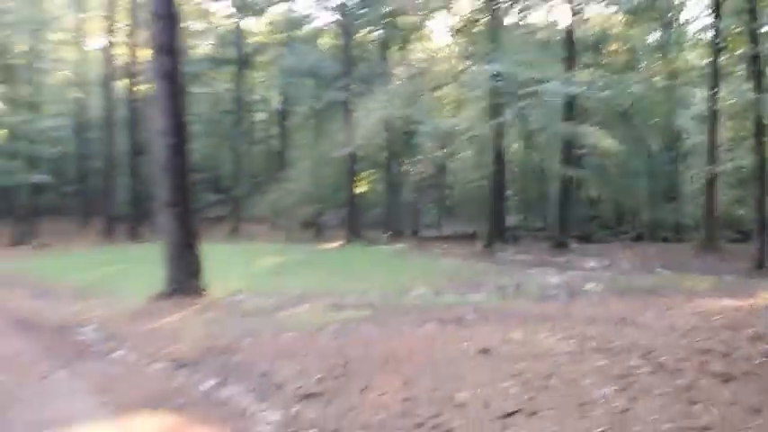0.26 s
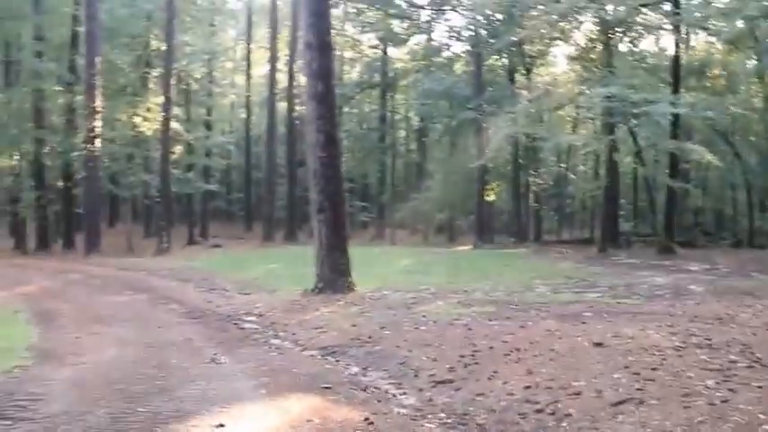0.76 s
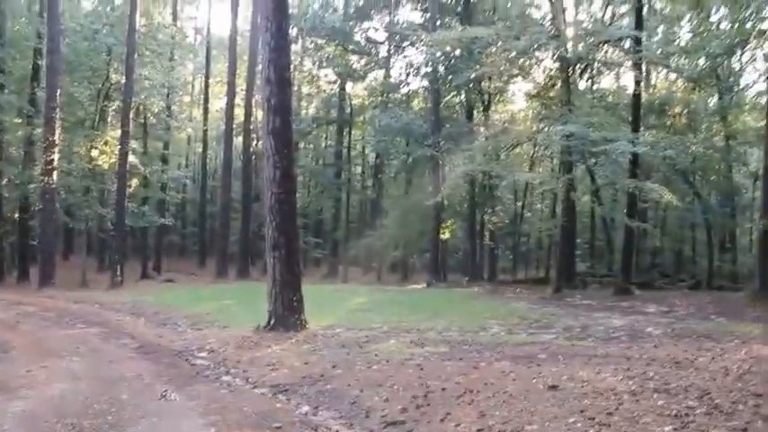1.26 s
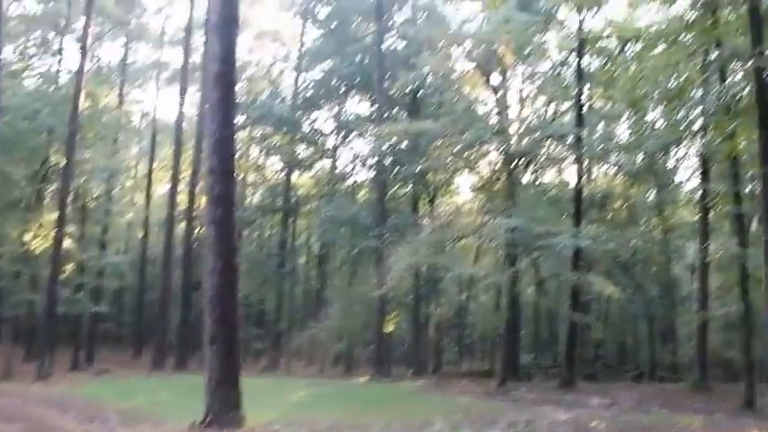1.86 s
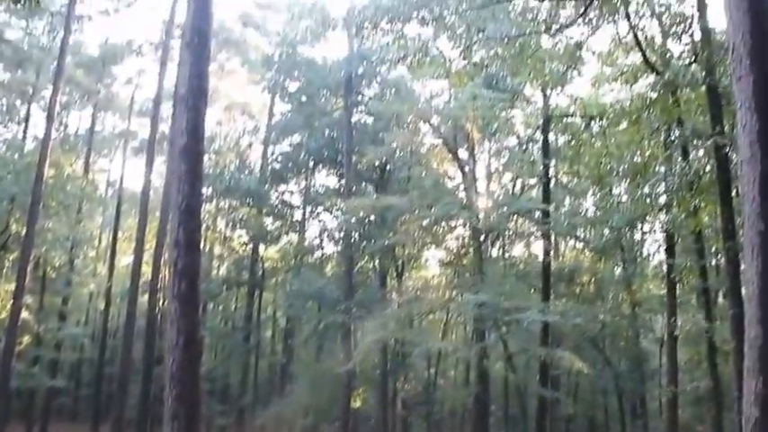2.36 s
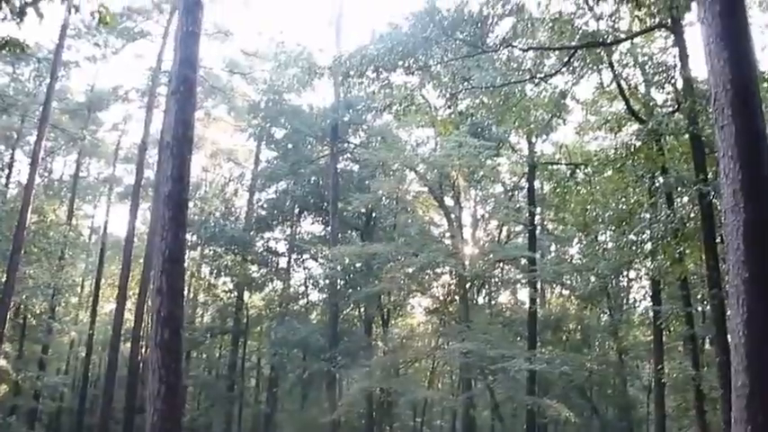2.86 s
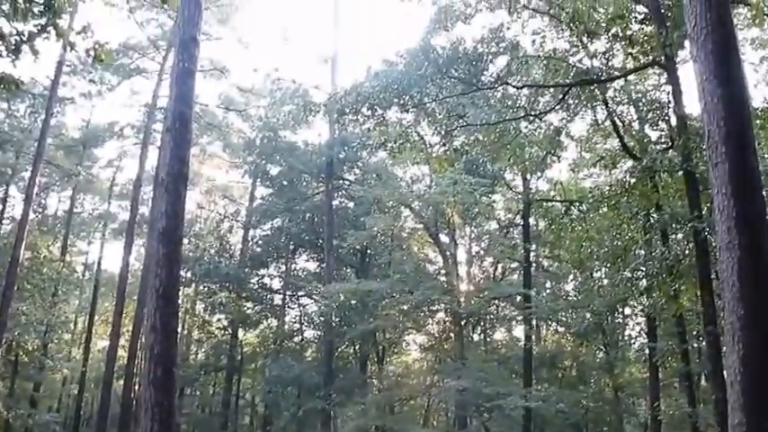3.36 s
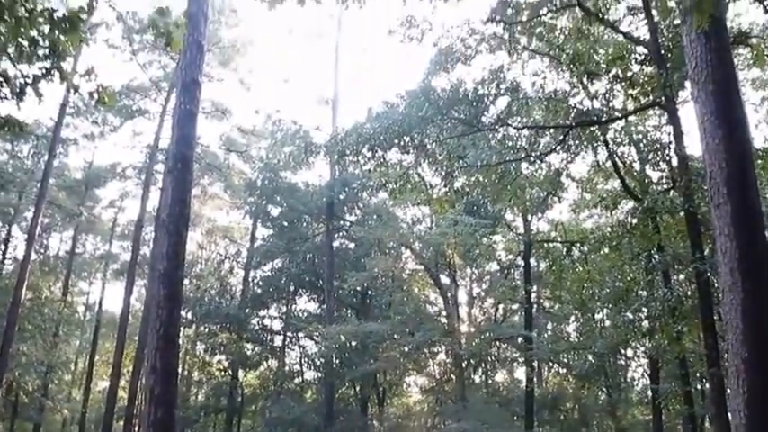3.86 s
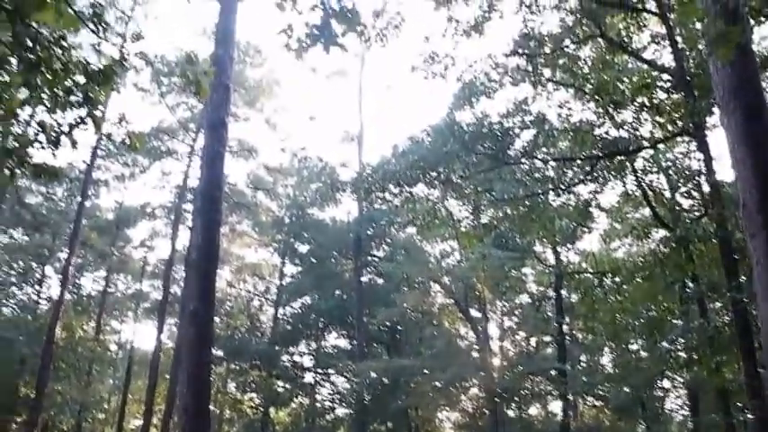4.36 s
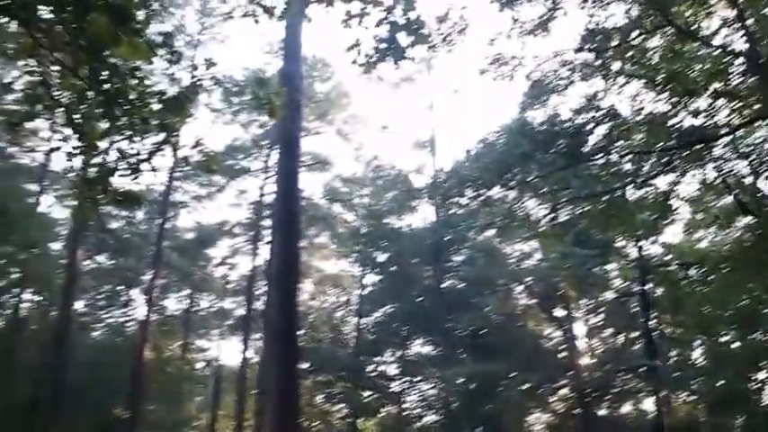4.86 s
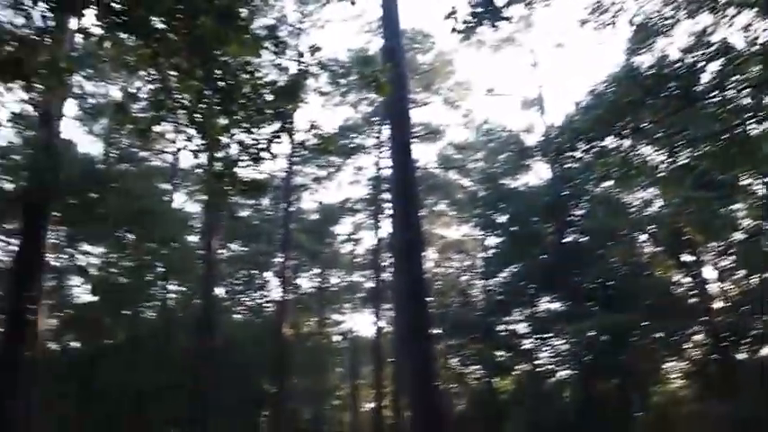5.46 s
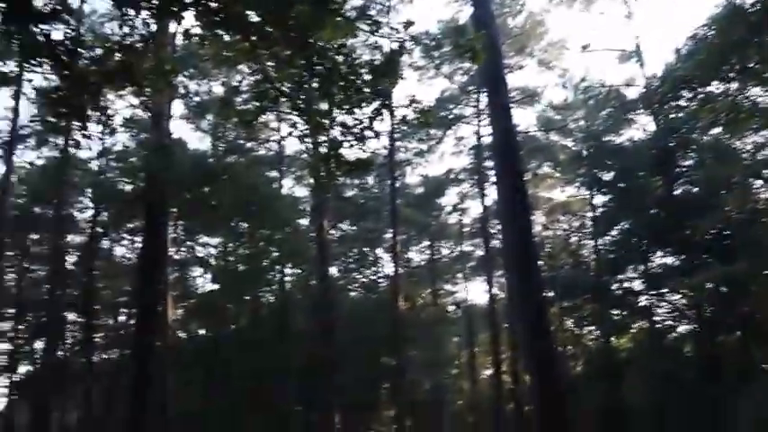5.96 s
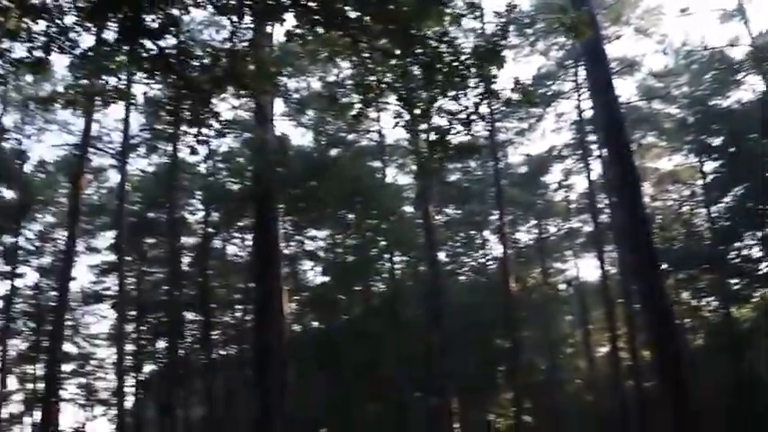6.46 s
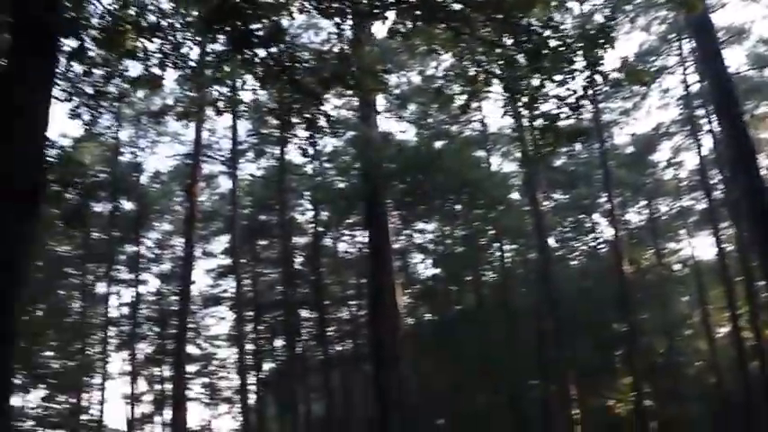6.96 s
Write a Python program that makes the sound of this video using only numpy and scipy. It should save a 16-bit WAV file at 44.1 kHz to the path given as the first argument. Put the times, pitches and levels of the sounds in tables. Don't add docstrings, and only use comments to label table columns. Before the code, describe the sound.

A gripped plastic shell snaps, ticks and creaks close up, then grows sparse and soft, above distant rumble, drone, leaf rustle and thin insect hiss.

```python
import sys
import numpy as np
from scipy import signal
from scipy.fft import rfft, irfft, next_fast_len
from scipy.io import wavfile
from scipy.ndimage import uniform_filter1d, map_coordinates

SR = 44100
rng = np.random.default_rng(int(sys.argv[2]) if len(sys.argv) > 2 else 0)


def store_wav(level_fs):
    pcm = np.round(np.clip(np.atleast_2d(level_fs), -1, 1) * 32767)
    wavfile.write(sys.argv[1], SR, pcm.T.astype(np.int16))


def rack_gain(trim_db):
    fader = np.asarray(trim_db, float)
    return 10 ** (fader / 20)


N = 318225

# pitch in Hz, level in dB, t60 in seconds, side the wall first moves to (+-1).
HOUSING_MODES = [(224, -1.6, 0.0162, -1), (497, 1.4, 0.0062, 1), (925, -17.5, 0.0193, 1),
                 (1011, -13.5, 0.025, 1), (1286, -6.5, 0.0158, 1), (1517, 0.0, 0.0189, -1),
                 (1648, -5.4, 0.017, 1), (2395, -6.5, 0.0134, 1), (2816, -20.2, 0.0233, -1),
                 (3785, -4.1, 0.0031, -1), (4387, -14.6, 0.0072, -1), (5726, -6.8, 0.0047, 1),
                 (6242, -14.1, 0.0054, 1), (7225, -9.5, 0.0015, -1)]
# centre in Hz, width in Hz, level in dB.
CHORUS_BANDS = [(7930, 790, -65.5), (5350, 140, -79.5)]


def unit(x):
    return x / np.sqrt(np.mean(x ** 2) + 1e-20)


def curves(rows):
    s, *cols = np.transpose(rows)
    return [np.interp(np.arange(N) / SR, s, c) for c in cols]


def wobble(rate_hz):
    knots = rng.standard_normal(int(N * rate_hz / SR) + 4)
    return map_coordinates(knots, [np.arange(N) * rate_hz / SR])


def filtered(x, response):
    m = next_fast_len(N + 8192)
    return irfft(rfft(x, m) * response(np.fft.rfftfreq(m, 1 / SR) + 1), m)[:N]


def band(centre_hz, width_hz):
    return unit(filtered(rng.standard_normal(N), lambda f: np.exp(-((f - centre_hz) / width_hz) ** 2)))


def rush(spectrum, patchy_db):
    z = signal.stft(rng.standard_normal(N + 512), nperseg=512)[2]
    field = uniform_filter1d(rng.standard_normal(z.shape), size=6, axis=0)
    field = uniform_filter1d(field, size=12, axis=1)
    x = signal.istft(z * rack_gain(patchy_db * unit(field)), nperseg=512)[1][:N]
    hz, db = np.transpose(spectrum)
    return unit(filtered(x, lambda f: rack_gain(np.interp(np.log(f), np.log(hz), db, left=-120, right=-120))))


def ring(hz, gain, t60_s, late_s=0):
    t = np.maximum(np.arange(SR // 20)[:, None] / SR - late_s, 0)
    return (gain * rack_gain(-60 * t / t60_s) * np.sin(2 * np.pi * hz * t)).sum(axis=1)


def add(track, s, sound):
    part = track[int(s * SR):][:len(sound)]
    part += sound[:len(part)]


def every_slip():
    # start in seconds, strength, sharpness and thud in dB.
    singles = [(0.3438, -7, -4, -4), (0.3564, -8.5, 2, 1), (0.3619, -10, 8, 4), (0.3662, -6.5, 4, -8),
               (0.3932, -4, 3, 1), (0.3993, -7, 3, 3), (0.4077, -7.5, 9, 4), (0.4172, -4, 5, 2),
               (0.534, -6.5, 7, 2.5), (0.7754, -5.5, 3, 0.5), (0.7833, -6, 4.5, 1.5), (0.795, -6, 2, -1),
               (0.8093, -6, 3, 2), (0.9651, -7, 3.5, 3.5), (0.975, -3, 3.5, -1.5), (0.985, -5, 6.5, -0.5),
               (1.3983, 0, 2, 0), (2.4008, -5.5, -0.5, 2), (4.7084, -19, -9, 14.5), (6.2997, -12, -7, 5),
               (6.8986, -18.5, -23, 9.5), (7.1464, -24.5, -10, 17), (7.1614, -19.5, -10, 9)]
    # start in seconds, strength in dB, sharpness in dB, wait in ms, second slip in dB.
    doubles = [(0.6416, -4, 3, 10.7, -6), (0.6986, -5.5, 4, 6.4, -6), (1.2135, -2, -1.5, 12.2, 0.5),
               (1.2937, 0.2, 2.5, 11.2, 0), (1.4873, 0.5, -1, 11.3, -2), (1.7352, -1, -3.5, 10.2, -3),
               (1.8813, -1.1, -1.5, 14.2, -5), (1.934, -3.5, -4, 12.4, -3.5), (2.2764, -1.2, -0.5, 11, -3),
               (3.9939, 1.5, 1, 10.1, -3.5), (4.387, -6, -7.5, 13.3, -3), (4.8906, -12, -19.5, 14.5, -9),
               (5.9772, -5.5, -12, 12.4, -7.5), (6.804, -15, -23, 13.2, -12.5), (7.202, -15, -10, 8.6, -13)]
    s, first_db, sharp_db, wait_ms, second_db = np.transpose(doubles)
    sharp_db = np.r_[sharp_db, 0.45 * sharp_db + 2]
    thud_db = 0.44 * np.maximum(-sharp_db, 0)
    start_s = np.r_[s, s + wait_ms * 1e-3]
    return np.r_[singles, np.c_[start_s, np.r_[first_db, second_db], sharp_db, thud_db]]


def slips():
    # frequency in Hz, density in dB per Hz.
    tail_spectrum = [(150, -3), (400, -11), (1500, -2.0), (2500, -4.5), (4000, -28),
                     (5400, -21.5), (6200, -16), (7000, -41), (9000, -23)]
    hz, db, t60_s, side = np.transpose(HOUSING_MODES)
    scale = 0.21 / np.abs(ring(hz, side * rack_gain(db), t60_s)).max()
    reach = np.clip((hz - 2000) / 1500, 0, 1)
    t = np.arange(SR // 20) / SR
    snick = np.sin(2 * np.pi * 6150 * t) * rack_gain(-60 * t / 0.031) * (1 - np.exp(-t / .001))
    top = np.sin(2 * np.pi * 8300 * t) * rack_gain(-60 * t / 0.003)
    top += rack_gain(3) * np.sin(2 * np.pi * 10300 * t) * rack_gain(-60 * t / 0.0015)
    shell = rack_gain(-60 * t / 0.057) * (1 - np.exp(-t / 0.00043))
    out, blows = np.zeros(N), np.zeros(N)
    for s, strength_db, sharp_db, thud_db in every_slip():
        gain_luck, pitch_luck = rng.standard_normal((2, len(hz)))
        mode_db = db + strength_db + sharp_db * reach + thud_db * (hz < 650) + .5 * gain_luck
        modes = ring(hz * (1 + 0.0024 * pitch_luck), side * rack_gain(mode_db), t60_s, late_s=s % (1 / SR))
        add(out, s, scale * modes)
        add(out, s, rack_gain(strength_db + sharp_db - 46) * snick)
        add(out, s + .0001, rack_gain(strength_db + sharp_db - 38) * top)
        add(blows, s, rack_gain(strength_db) * shell)
    out = signal.sosfilt(signal.butter(2, 11000, fs=SR, output="sos"), out)
    return out + rack_gain(-33.5) * blows * rush(tail_spectrum, patchy_db=-0.5)


def snap():
    # start in seconds, level in dB, dulling in dB per octave.
    snap_blows = [
        (.4207, -.8, 0),
        (.4290, -15, -10),
    ]
    # pitch in Hz, level in dB, t60 in seconds, side (+-1).
    latch_modes = [(776, -16.4, 0.0319, 1), (920, -9.3, 0.02, -1), (1171, -20.6, 0.0211, -1),
                   (1493, -7.7, 0.0137, 1), (1646, -17.2, 0.0213, 1), (1902, -9.3, 0.0164, -1),
                   (2103, -9.4, 0.0113, -1), (2295, -4.9, 0.0063, 1), (2739, -15.2, 0.0128, -1),
                   (3727, -37, 0.022, 1), (150, -29, 0.025, 1), (3300, -29, 0.006, -1),
                   (4300, -24, 0.005, -1), (5100, -25, 0.005, 1)]
    hz, db, t60_s, side = np.transpose(latch_modes)
    octaves = np.abs(np.log2(hz / 900))
    out = np.zeros(N)
    for s, level_db, tilt_db in snap_blows:
        add(out, s, rack_gain(level_db) * ring(hz, side * rack_gain(db + tilt_db * octaves), t60_s))
    return out


def every_contact():
    # start in seconds, peak in dB, pitch in Hz, thud in dB, crack in dB.
    knock_rows = [(0.0038, -35, 1050, -20, -20), (0.0899, -28, 1060, -19, -39),
                  (0.1258, -30, 1610, -16, -12), (0.2354, -29, 1160, -4, -5),
                  (0.2501, -28.5, 1550, -1, -11), (0.2568, -25.5, 1580, -3, -2),
                  (0.273, -35, 1120, -13, -13), (0.282, -32.5, 1520, 1, -9),
                  (0.2938, -21.5, 1160, -9, -6.5), (0.3237, -22, 1100, -6.5, -4.5),
                  (0.4835, -32.5, 1000, -13, -1), (0.4868, -31, 801, -4, -13), (0.5222, -28, 830, 0, -3),
                  (0.6328, -28, 720, 6, 1), (2.0429, -35.5, 1220, -6, -31), (6.2861, -41, 787, 13, -22),
                  (6.378, -37, 1210, -9, -9.5), (6.7137, -44, 800, 15.5, -8), (6.8791, -42, 714, 10, -23),
                  (7.026, -43.5, 840, 12.5, -10), (7.1074, -31, 1200, -19, -19),
                  (7.1367, -28, 764, -16, -25), (7.158, -28, 880, -12, -21)]
    # start in seconds, peak in dB, pitch in Hz, crack in dB.
    tap_rows = [(0.0544, -34.5, 1690, -14), (0.107, -34, 1670, -15), (1.2211, -24, 1310, -35),
                (1.278, -34, 1000, -30), (1.7046, -29.5, 1870, -10.5), (1.9654, -28.5, 1030, -47),
                (2.459, -43.1, 2400, -5), (2.8166, -39, 1530, -6), (3.5858, -33, 1180, -21),
                (5.1512, -24, 1111, -45), (5.1672, -41.6, 1220, -28), (5.1728, -32, 840, -23),
                (5.1752, -29.5, 1080, -22), (5.2197, -41, 1030, -30), (5.235, -42.4, 1440, -28),
                (5.5136, -38.5, 1400, 4.5), (6.2552, -42, 1180, 1), (6.3577, -37, 1230, -9),
                (6.4044, -36, 818, -26), (6.6176, -48, 850, -22), (6.703, -37, 950, -23),
                (6.755, -37.5, 1130, -26), (6.9365, -36.2, 1120, -25), (6.9622, -27.5, 1050, -27),
                (6.9705, -34.2, 1020, -20), (6.977, -26, 1100, -18), (6.988, -29.4, 1065, -26),
                (7.194, -32, 1160, -8)]
    # start in seconds, peak in dB, pitch in Hz, thud in dB.
    lump_rows = [
        (0.1427, -24, 867, -16),
        (.1520, -25.5, 964, -12),
        (0.1549, -30.5, 604, -2),
        (0.1627, -23, 610, -4.5),
        (0.1737, -27, 674, -7),
    ]
    rows = []
    for s, peak_db, hz, thud_db, crack_db in knock_rows:
        ring_cycles = max(25 + 0.2 * crack_db, 14)
        rows.append((s, peak_db, hz, ring_cycles / hz, thud_db, crack_db))
    rows += [(s, peak_db, hz, 0.0092, -33, crack_db) for s, peak_db, hz, crack_db in tap_rows]
    rows += [(s, peak_db, hz, 0.025, thud_db, -28) for s, peak_db, hz, thud_db in lump_rows]
    return rows


def knocks():
    hz, db, t60_s, side = np.transpose(HOUSING_MODES[:2])
    t = np.arange(SR // 20) / SR
    soft = 1 - np.exp(-(t / 0.00052) ** 2)
    thud = ring(hz, side * rack_gain(db), t60_s)
    thud = soft * thud / np.abs(thud).max()
    surface = signal.butter(2, [2200, 13000], "bandpass", fs=SR, output="sos")
    out = np.zeros(N)
    for s, peak_db, pitch_hz, life_s, thud_db, crack_db in every_contact():
        pitch_luck, gain_luck = rng.standard_normal((2, 9))
        cluster_hz = pitch_hz * np.exp(np.linspace(-.5, .42, num=9) + 0.051 * pitch_luck)
        cluster_side = np.sign(np.cos(2 * np.pi * cluster_hz * .0006))
        body = -soft * ring(cluster_hz, rack_gain(2 * gain_luck) * cluster_side, life_s)
        crack = signal.sosfilt(surface, rng.standard_normal(len(t))) * rack_gain(-60 * t / 0.0088)
        sound = body / np.abs(body).max() + rack_gain(thud_db + 1.5) * thud + rack_gain(crack_db - 6.0) * crack
        add(out, s, rack_gain(peak_db) * sound)
    return out


def pings():
    # start in seconds, peak in dB, pitch in Hz, t60 in seconds.
    touches = [(0.0903, -40, 1400, 0.022), (.1165, -37, 1550, .03), (.1415, -25, 640, .03),
               (0.1528, -28, 1360, .02), (.1625, -24, 560, .04), (.174, -28, 620, .03),
               (.1975, -36, 700, .025), (.222, -36, 1590, .04), (.2725, -33, 1300, .025),
               (0.2942, -32, 1350, .025), (.3475, -27, 1400, .025), (.4915, -37, 1100, .015),
               (0.7695, -22, 1270, 0.014), (6.358, -39, 1800, 0.021), (6.367, -44, 1500, .015),
               (6.374, -41, 1500, .015), (6.391, -46, 1450, .03), (7.1415, -38, 1000, .02)]
    out, t = np.zeros(N), np.arange(SR // 20) / SR
    for s, peak_db, hz, t60_s in touches:
        sound = (1 - np.exp(-(t / 0.0007) ** 2)) * ring(hz * np.array([.93, 1.07]), 1, t60_s)
        add(out, s, rack_gain(peak_db) * sound / np.abs(sound).max())
    return out


def rub():
    # time in seconds, pressure in dB, speed in dB.
    stroke = [(.05, -66, -17), (.092, -47, -12), (.104, -53, -3), (.128, -45.5, -5), (.176, -46, -12),
              (.186, -53, -8), (.2, -44, -12), (.21, -51, -8), (.225, -44.5, -12), (.26, -43, -7.5),
              (.29, -47, -8), (.315, -58, -8), (.34, -53, -6), (.365, -38, -7.5), (.388, -43, -5),
              (.42, -40, -7), (.44, -58, -20)]
    # middle in seconds, half length in seconds, level in dB.
    heavy_drag = (.158, 0.018, 6)
    pressure_db, speed_db = curves(stroke)
    hz, db, t60_s, side = np.transpose(HOUSING_MODES)
    grains = rng.standard_normal(N) * rack_gain(2.6 * wobble(300) + 1.7 * wobble(92.0))
    mode_db = db - 8.5 * (hz < 650) - 5 * (hz > 2000) - 24 * (hz > 3000)
    body = np.convolve(grains, ring(hz, side * rack_gain(mode_db), t60_s)[:600])[:N]
    fizz = filtered(grains, lambda f: 1 / (1 + (1900 / f) ** 4) / (1 + (f / 4200) ** 2))
    fizz = unit(fizz) * rack_gain(2.5 * wobble(150))
    drag = filtered(grains, lambda f: 1 / (1 + (350 / f) ** 4) / (1 + (f / 1150) ** 4))
    t = np.arange(N) / SR
    middle_s, half_s, heavy_db = heavy_drag
    light_db = -9.5
    drag_db = light_db + (heavy_db - light_db) * np.exp(-((t - middle_s) / half_s) ** 4)
    touching = (t > stroke[0][0]) & (t < stroke[-1][0])
    return touching * rack_gain(pressure_db) * (unit(body) + rack_gain(speed_db) * fizz + rack_gain(drag_db) * unit(drag))


def insects():
    # start in seconds, peak in dB.
    ticks = [(2.8853, -54), (2.9751, -54), (3.02, -55), (3.065, -55), (3.4825, -46.5), (3.6885, -54),
             (3.7658, -50), (3.8267, -48), (4.0148, -44), (4.0716, -45), (4.1245, -43.5), (5.32, -52),
             (5.513, -52), (2.46, -52)]
    out = np.zeros(N)
    for centre_hz, width_hz, db in CHORUS_BANDS:
        out += rack_gain(db + 0.69 * wobble(8) + 1.2 * wobble(40)) * band(centre_hz, width_hz)
    t = np.arange(SR // 50) / SR
    tick = np.sin(2 * np.pi * 5250 * t) * (t / 0.0011) * np.exp(1 - t / 0.001)
    for s, db in ticks:
        add(out, s, rack_gain(db) * tick)
    return out


def engine():
    # pitch in Hz, drift in Hz.
    drone_pitch = (134, 2.36)
    # peak time in seconds, peak in dB, fade in dB per second.
    swells = [
        (.34, -55, 32),
        (1.02, -54, 24),
        (1.91, -54, 8),
        (3.28, -64, 15),
        (4.26, -54, 13),
        (5.06, -55, 11),
        (5.91, -52, 6.5),
    ]
    # middle in seconds, half length in seconds, pitch in Hz, level in dB.
    passing_note = (4.58, 0.12, 325, -57)
    t = np.arange(N) / SR
    hz, drift_hz = drone_pitch
    drone = unit(np.sin(2 * np.pi * np.cumsum(hz + drift_hz * wobble(9)) / SR))
    rise_db_per_s = 30
    swell_db = [db - np.where(t < peak_s, rise_db_per_s * (peak_s - t), fade * (t - peak_s))
                for peak_s, db, fade in swells]
    level_db = np.max(swell_db, axis=0)
    middle_s, half_s, note_hz, note_db = passing_note
    note = np.exp(-((t - middle_s) / half_s) ** 4) * band(note_hz, 50)
    return rack_gain(level_db + 1.4 * wobble(7)) * drone + rack_gain(note_db) * note


def wood():
    # time in seconds, level in dB.
    road_level = [(0, -48.5), (.62, -50), (.78, -53), (1.04, -50), (1.69, -51), (2.1, -51.5), (2.71, -51),
                  (3.1, -50.5), (3.74, -52), (4.96, -50), (5.5, -51.5), (6.35, -51.5), (7.11, -48.5),
                  (7.22, -43)]
    breeze_level = [(0, -57), (.12, -49), (.28, -43.5), (.34, -59.5), (.62, -51.5), (1.04, -56),
                    (1.37, -53.5), (1.75, -54.5), (2.66, -54.5), (2.95, -52), (3.35, -55.5), (3.86, -55.5),
                    (4.52, -51.5), (4.96, -55), (5.65, -52), (6.5, -54.5), (6.85, -53.5), (7.22, -47)]
    # frequency in Hz, density in dB per Hz.
    traffic_spectrum = [(12, -60), (20, -9.5), (48, -5.5), (117, 0.5), (156, 0), (201, -1), (309, -13),
                        (468, -15), (505, -9.5), (700, -13.5), (910, -63), (1540, -120)]
    leaves_spectrum = [(180, -41), (300, 2), (469, -2.5), (510, -9), (835, -4.5), (974, -8), (1130, -7),
                       (5000, -24), (6500, -55), (11000, -120)]
    hiss_spectrum = [(1500, 5), (3000, 0.5), (6000, 0), (10000, -3), (14500, -2.5), (15750, -2.5)]
    (traffic_db,), (leaves_db,) = curves(road_level), curves(breeze_level)
    hiss_db = -65.5 + 0.23 * (leaves_db - leaves_db.mean())
    traffic = rack_gain(traffic_db) * rush(traffic_spectrum, patchy_db=1.14)
    leaves = rack_gain(leaves_db + 0.7 * wobble(6.3)) * rush(leaves_spectrum, patchy_db=1.5)
    return traffic + leaves + rack_gain(hiss_db + 6.5) * rush(hiss_spectrum, patchy_db=1.0)


def scene():
    housing = slips() + snap() + knocks() + pings() + rub()
    low_cut = signal.butter(2, 70, "highpass", fs=SR, output="sos")
    return (signal.sosfilt(low_cut, housing) + insects() + engine() + wood())[None]


def dropouts(x):
    # middle in seconds, depth in dB, lowest frequency dropped in Hz.
    drops = [(.0678, -25, 3200), (.26, -12, 5000), (.449, -38, 3000), (.606, -30, 3200), (1.156, -7, 4000),
             (1.668, -24, 3000), (1.963, -32, 3900), (2.1585, -24, 3500), (2.2225, -13, 2800),
             (2.284, -33, 7500), (2.415, -32, 3700), (2.7985, -8, 3300), (3.161, -10, 3000),
             (3.5665, -24, 2800), (3.6305, -12, 2500), (3.865, -25, 2300), (4.099, -12, 2500),
             (4.8465, -7, 3300), (5.4012, -22, 2500), (6.148, -10, 3300), (6.233, -21, 2100),
             (6.8945, -10, 2800), (7.148, -33, 2800)]
    # middle in seconds, half length in seconds, level in dB.
    smear_spot = (2.289, 0.013, -40.5)
    # centre in Hz, width in Hz, level in dB.
    smear_bands = [(1520, 220, -6), (2270, 330, -1.5), (3070, 40, -14), (3720, 150, -6), (4890, 40, -14),
                   (5780, 170, -8), (6590, 250, -8.5), (7160, 50, -15)]
    # from Hz, to Hz.
    empty_bands = [(3200, 3500), (4050, 4750), (5050, 5500), (6050, 6250), (7300, 8400)]
    smear_s, half_s, smear_db = smear_spot
    gate = np.exp(-((np.arange(N) / SR - smear_s) / half_s) ** 6)
    smear = sum(rack_gain(db) * band(centre_hz, width_hz) for centre_hz, width_hz, db in smear_bands)
    hz, t, z = signal.stft(x + rack_gain(smear_db) * gate * smear, SR, nperseg=256, noverlap=224)
    chorus = sum(np.abs(hz - centre_hz) < .45 * width_hz for centre_hz, width_hz, _ in CHORUS_BANDS) > 0
    odds = np.where(hz < 7000, .15, .04)
    for s, depth_db, lowest_hz in drops:
        luck = rng.random(100)[(hz // 350).astype(int)]
        lucky = luck < odds * (depth_db > -35) + rack_gain(2 * depth_db)
        spared = chorus * (lowest_hz < 7000) | lucky
        away_s = np.abs(t - s) + min(depth_db + 25, 0) / 2200
        left = np.clip(away_s / .014, 0, 1) ** 1.1
        z[(hz > lowest_hz) & ~spared] *= np.maximum(left, rack_gain(min(depth_db, -24)))
        z[(hz > lowest_hz) & spared] *= 1.5 - .5 * left
    for low_hz, high_hz in empty_bands:
        z[(hz > low_hz) & (hz < high_hz)] *= 1 - .95 * np.exp(-((t - smear_s) / half_s) ** 6)
    return signal.istft(z, SR, nperseg=256, noverlap=224)[1][:N]


def low_pass(x):
    return signal.sosfilt(signal.butter(12, 16610, fs=SR, output="sos"), x)


def record(dry):
    x = filtered(dropouts(dry[0]), lambda f: f < 16600)
    dc_offset = .001
    return low_pass(x[None] + dc_offset)


dry = scene()
out = record(dry)
store_wav(out)
```